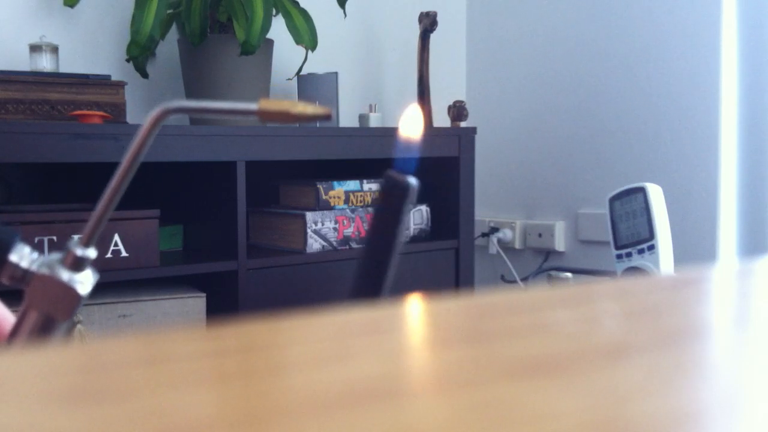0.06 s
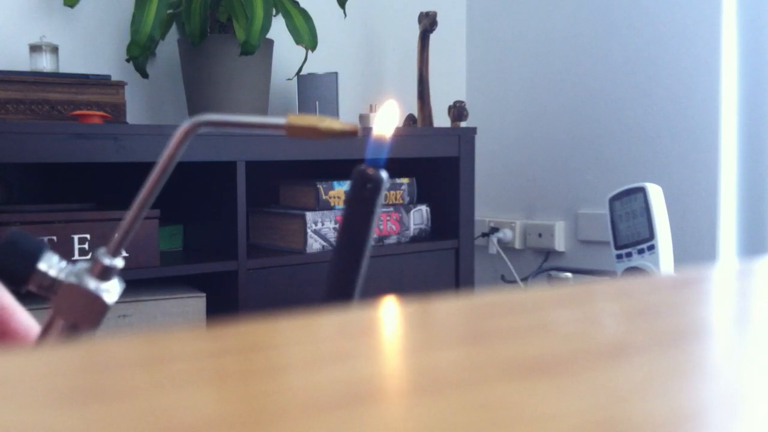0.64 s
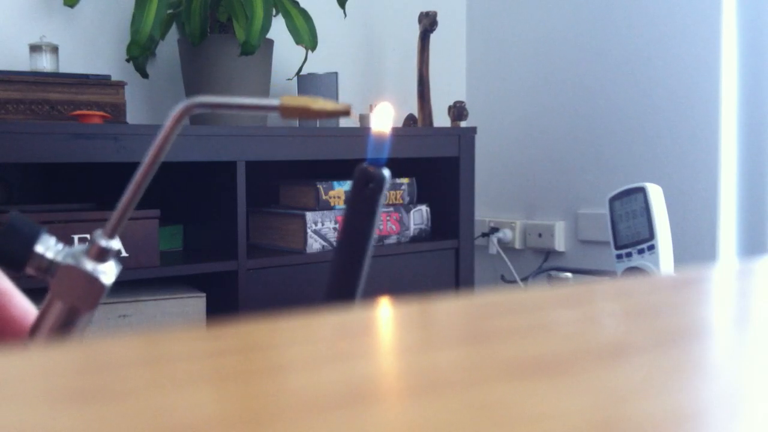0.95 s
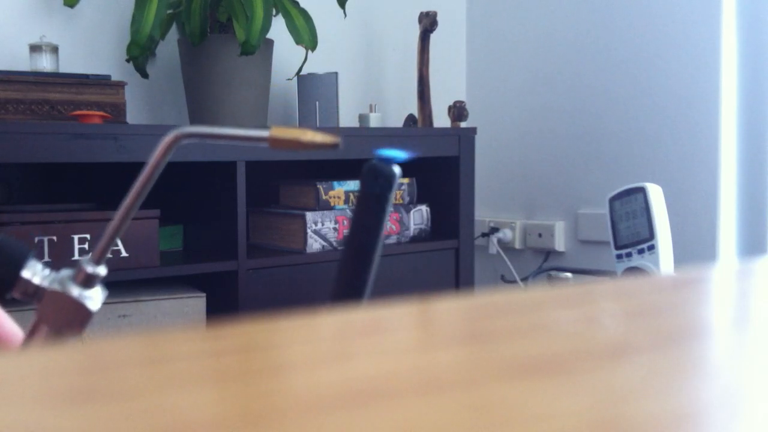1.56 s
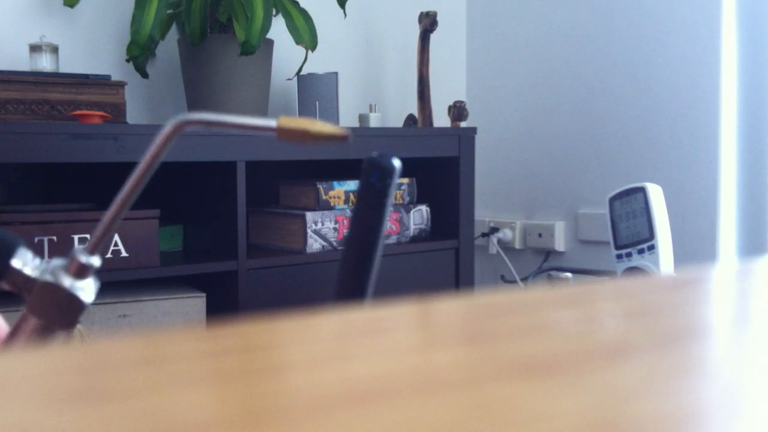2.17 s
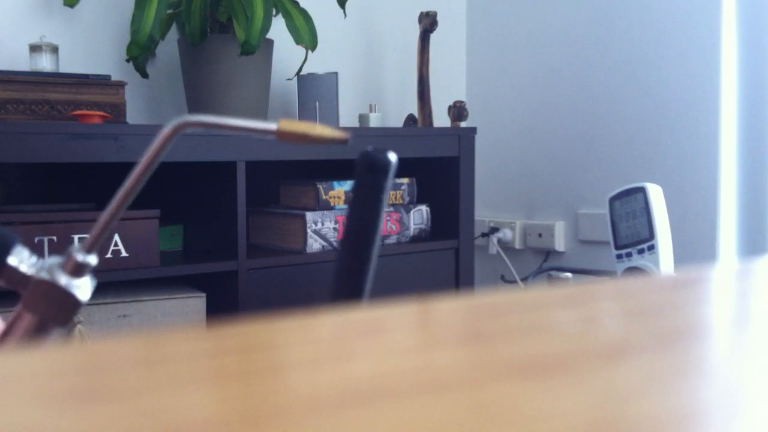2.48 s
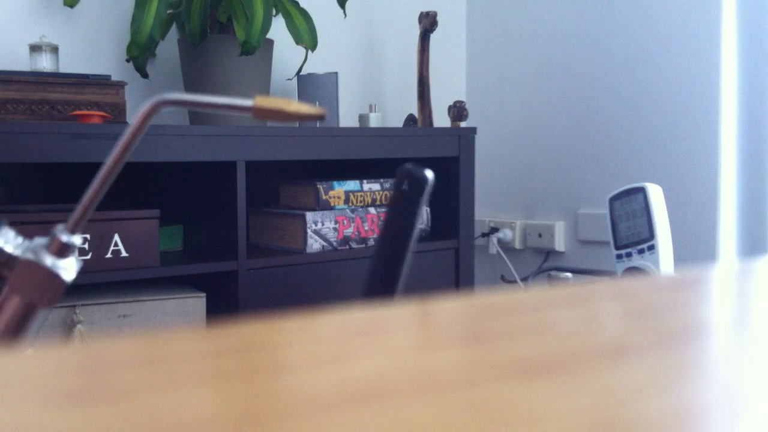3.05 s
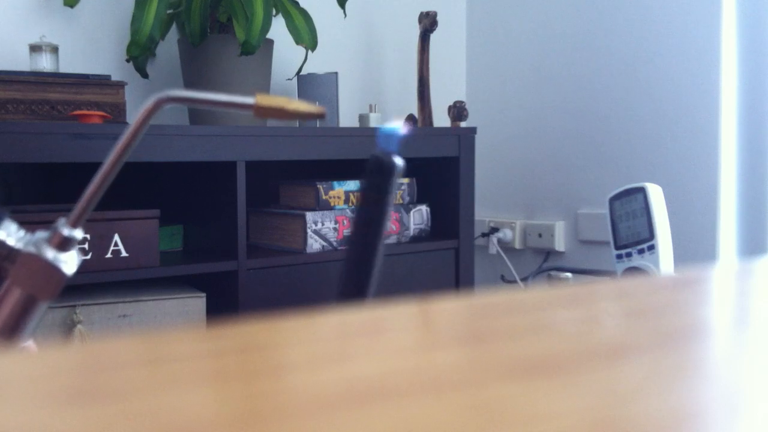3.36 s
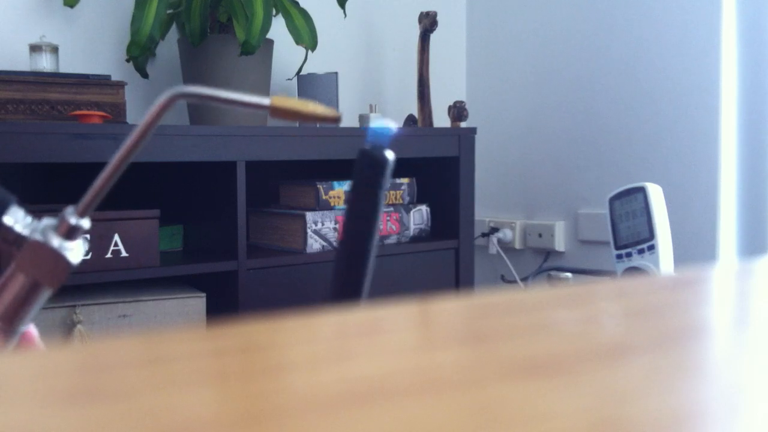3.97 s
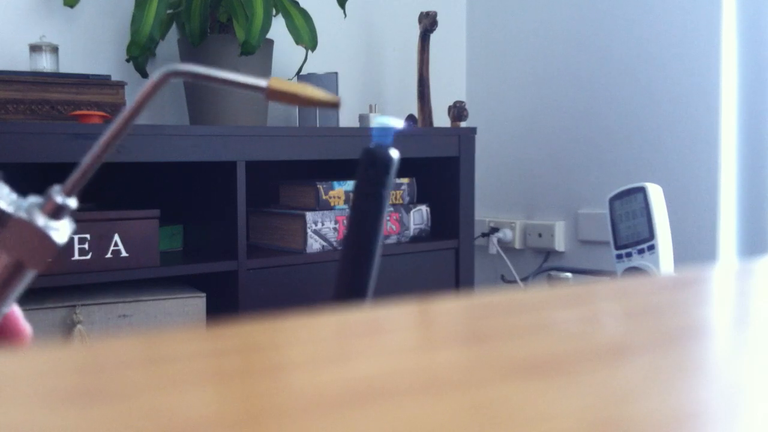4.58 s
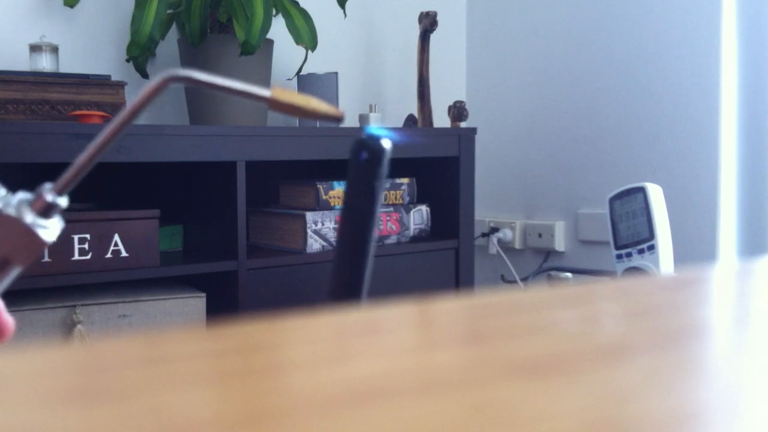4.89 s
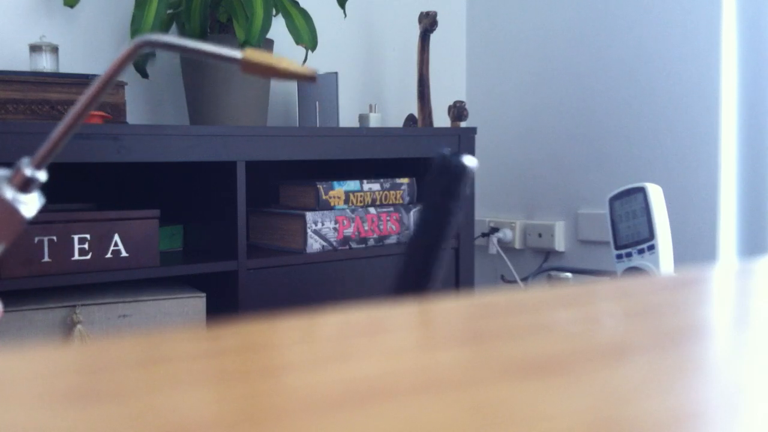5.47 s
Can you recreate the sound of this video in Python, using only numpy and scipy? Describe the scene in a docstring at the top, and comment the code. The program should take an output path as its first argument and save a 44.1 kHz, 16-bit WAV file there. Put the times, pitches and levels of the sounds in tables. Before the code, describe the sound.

A gas torch blows through a lighter flame in three hissing, fluttering bursts with small pops and one sharp lighter snap, over a low hum.

```python
"""A low steady hum fills a small room, then a gas torch blows through a lighter flame in three bursts.
The torch never catches fire. The speed of its jet sets the sound: a quiet fluttering roar while slow,
a loud even hiss while fast. The flame pops whenever the jet lets go of it.
Before the last burst a sleeve rustles softly and the lighter snaps on."""
import sys
import numpy as np
from scipy import signal
from scipy.fft import rfft, irfft, next_fast_len
from scipy.io import wavfile
from scipy.ndimage import map_coordinates

SR = 44100
rng = np.random.default_rng(int(sys.argv[2]) if len(sys.argv) > 2 else 0)


def dump_mix(stems):
    """Bounce the given channels to the path in sys.argv[1] as a 16-bit WAV at rate SR."""
    frames = np.atleast_2d(stems).T  # one column per channel
    limited = np.clip(frames, -1, 1)  # hard clip at full scale
    pcm = np.round(limited * 32767).astype(np.int16)
    wavfile.write(sys.argv[1], SR, pcm)


N = 252472

# tone of the room's noise: (frequency [Hz], relative level [dB])
ROOM_NOISE = [(15, -82), (25, -59), (64, -43), (96, -22), (164, -23), (198, -10), (445, -18), (482, -15),
              (598, -10.5), (684, -17), (1570, -21.5), (3090, -33), (7300, -40.5), (10500, -42.5),
              (13500, -38), (15500, -33)]
# tones of a humming appliance: (frequency [Hz], level [dB])
HUM_TONES = [(199.5, -58), (242, -66.5), (608, -66), (813, -67), (1610, -71)]
# the jet tears at the flame, then lets go: (start [s], end [s], jet gain [dB], pop level [dB])
BURSTS = [(0.24, 0.78, 2, -21.5), (0.926, 2.244, -.5, -23), (3.447, 5.091, 0, -19)]
# jet speed in each burst, heard as the centre of its noise: (time [s], centre [Hz])
FIRST_SPEED = [(0.24, 584), (0.29, 735), (0.34, 1420), (0.39, 1900), (0.51, 1900), (0.56, 2570),
               (0.71, 2480), (0.73, 3440), (0.76, 2550)]
SECOND_SPEED = [(0.922, 2520), (0.99, 12800), (1.14, 14900), (1.19, 7900), (1.26, 12400), (1.308, 3320),
                (1.51, 4300), (1.56, 2800), (1.69, 2550), (1.78, 1430), (1.89, 1480), (2.05, 4470.0),
                (2.13, 2000), (2.21, 5000)]
THIRD_SPEED = [(3.46, 587), (3.52, 1060), (3.57, 2690), (3.67, 1860), (3.73, 2960), (3.84, 1360),
               (3.9, 1500), (3.925, 2930), (4.02, 8100), (4.1, 4150), (4.27, 21200), (4.33, 10400),
               (4.39, 17700), (4.53, 8060), (4.63, 6400), (4.84, 2490), (5.06, 7260)]
# peaks and dips on the way over the table to the microphone: (frequency [Hz], width [Hz], gain [dB])
PATH_PEAKS = [(286, 12, 8), (390, 250, -1.5), (710, 156, 6), (857, 52, -16), (1596, 530, 4.5),
              (3475, 940, 4), (5044, 810, 5.5), (5560, 320, -7), (6170, 640, 4.5), (7630, 370, -5),
              (8210, 130, 6.5), (9950, 1650, -12), (11400, 380, -9.5), (11900, 400, 2.5),
              (14050, 1700, 3.5), (15250, 550, -1)]
# the room's echo: (frequency [Hz], time to fade by 60 dB [s])
ECHO_FADES = [(150, 0.5), (800, 0.47), (2000, 0.29), (5500, 0.27), (15000, .24)]
# a slow jet loses the flame for a moment: (start [s], end [s], dip [dB])
BREAKS = [(0.7, 0.711, -6), (3.846, 3.862, -22), (3.882, 3.888, -18), (3.902, 3.912, -26)]
# the flap as the jet catches the flame again: (pop level [dB], thump level [dB], fade time [s])
FLAP = (-27.5, -46, 0.075)
# the flame is hit, lit or goes out: (time [s], pop level [dB], thump level [dB], fade time [s])
PUFFS = [(.923, -24.5, -39, 0.036), (1.661, -24, -55, 0.01), (1.69, -34, -51, .03), (3.26, -31, -37, 0.047),
         (5.176, -33, -41, 0.096)]
# a soft sleeve rustle, then the lighter's clicks and snaps:
# (time [s], level [dB], brightness [Hz], rise time [s], fade time [s])
RUSTLE_AND_SNAPS = [(2.635, -45, 12000, 0.046, 0.19), (2.896, -42, 1600, .0002, 0.02),
                    (3.2443, -12, 6200, 0.00018, 0.02), (3.255, -24, 12000, .0005, 0.037),
                    (5.618, -40, 2000, 0.00041, 0.029)]
# ringing of the lighter's plastic body: (frequency [Hz], relative level [dB], fade time [s])
BODY_TONES = [(880, -8, 0.0069), (1340, -8, .011), (2960, -2, 0.0097)]

TOP_HZ = 15800  # upper edge of the treble


def amp(db):
    """Turn decibels into a number to multiply by."""
    return 10 ** (np.asarray(db) / 20)


def along(points, hz):
    """Read between (frequency, value) points, with octaves evenly spaced."""
    freqs, values = np.transpose(points)
    return np.interp(np.log(hz + 1), np.log(freqs + 1), values)


def wobble(rate):
    """A smooth random curve through `rate` values a second."""
    return map_coordinates(rng.standard_normal(int(N * rate / SR) + 4), [np.arange(N) * rate / SR])


def filtered(x, response):
    """Scale each frequency in x by response(hz)."""
    size = next_fast_len(len(x) + SR // 4)
    return irfft(rfft(x, size) * response(np.fft.rfftfreq(size, 1 / SR)), size)[:len(x)]


def noise(response, size):
    """Noise shaped by response(hz), with an average power of 1."""
    shaped = filtered(rng.standard_normal(size), response)
    return shaped / np.sqrt(np.mean(shaped ** 2) + 1e-20)


def hump(hz, centre_hz, rise, fall):
    """A broad hill of gain; rise and fall set how steep its low and high sides are."""
    ratio = (hz + 1) / centre_hz
    return np.sqrt(ratio ** rise / (1 + ratio * ratio) ** ((rise + fall) / 2))


def dying(t, fade_s):
    """A fade that drops 60 dB every fade_s seconds."""
    return np.exp(-np.log(1000) * t / fade_s)


def add(track, start_s, sound):
    """Mix a sound into the track at start_s."""
    part = track[round(start_s * SR):][:len(sound)]
    part += sound[:len(part)]


def small_source(x, low_hz):
    """A small thing gives off little sound below low_hz."""
    return signal.sosfilt(signal.butter(2, low_hz, "highpass", fs=SR, output="sos"), x)


def room_hum(air_db=-50, drift_db=-0.2, phase_drift=0.36):
    """Soft room noise and the slightly unsteady hum of an appliance."""
    t = np.arange(N) / SR
    air = amp(air_db + drift_db * wobble(5.6)) * noise(lambda hz: amp(along(ROOM_NOISE, hz)), N)
    hum = sum(amp(db) * np.sin(2 * np.pi * hz * t + phase_drift * wobble(10)) for hz, db in HUM_TONES)
    return air + np.sqrt(2) * hum


def flame_contact(t, attack_s=0.0033, release_s=0.02, break_edge_s=0.0013):
    """How firmly the jet holds the flame: on during a burst, dipping in each break."""
    def ramp(start, end, rise, fall):
        return np.clip(np.minimum((t - start) / rise, (end - t) / fall), 0, 1)
    held = sum(amp(db) * ramp(start, end, attack_s, release_s) for start, end, db, _ in BURSTS)
    dips_db = sum(db * ramp(start, end, break_edge_s, attack_s) for start, end, db in BREAKS)
    return held * amp(dips_db)


def gas_jet(full_db=-20, knee_hz=4460, growth=3.16, flutter_db=1.2, sway_db=0.75, calm_hz=4000):
    """Swirling gas: a faster jet makes smaller swirls, so its rush is higher and louder."""
    t = np.arange(N) / SR
    times, centre_hz = np.vstack([FIRST_SPEED, SECOND_SPEED, THIRD_SPEED]).T
    centre = np.exp(np.interp(t, times, np.log(centre_hz)) + 0.04 * wobble(18))  # wanders about 4%
    loudness = amp(full_db) / np.sqrt(1 + (knee_hz / centre) ** growth)  # levels off above the knee
    hz, frames, spectrum = signal.stft(rng.standard_normal(N), SR, nperseg=512)
    swirls = hump(hz[:, None], np.interp(frames, t, centre), rise=2.594, fall=4.24)
    swirls /= np.sqrt(np.mean(swirls ** 2 * (hz < TOP_HZ)[:, None], axis=0))  # same power at any speed
    rush = signal.istft(spectrum * swirls, SR, nperseg=512)[1][:N]
    # a slow jet lets the flame flutter; a fast one hisses evenly
    flutter = flutter_db * wobble(260) / np.sqrt(1 + (centre / calm_hz) ** 2)
    sway = sway_db * wobble(35)
    return small_source(rush * flame_contact(t) * loudness * amp(flutter + sway), low_hz=110)


def table_path(hz):
    """The path over the table boosts some frequencies and weakens others."""
    def resonance(centre, width):
        return centre ** 2 - hz ** 2 + 1j * hz * width
    return np.prod([resonance(centre, width * amp(db / 2)) / resonance(centre, width * amp(-db / 2))
                    for centre, width, db in PATH_PEAKS], axis=0)


def room_echo(x, delay_s=0.005):
    """The walls answer after a few milliseconds; the treble dies first."""
    hz, t, spectrum = signal.stft(rng.standard_normal(SR // 2), SR, nperseg=256)
    tail = signal.istft(spectrum * dying(t, along(ECHO_FADES, hz)[:, None]), SR, nperseg=256)[1]
    tail = np.pad(tail / np.linalg.norm(tail), (round(delay_s * SR), 0))
    return signal.fftconvolve(x, tail)[:N]


def flame_pops(end_lead_s=0.013, end_thump_db=-51, end_fade_s=0.022):
    """The flame flaps with a short puff over a low thump; one such pop ends every break and burst."""
    out, t = np.zeros(N), np.arange(SR // 5) / SR
    swell = 1 - np.exp(-t / 0.0006)
    flaps = [(end, *FLAP) for _, end, _ in BREAKS]
    end_pops = [(end - end_lead_s, db, end_thump_db, end_fade_s) for _, end, _, db in BURSTS]
    for start, pop_db, thump_db, fade_s in PUFFS + flaps + end_pops:
        puff = noise(lambda hz: hump(hz, centre_hz=1160, rise=2.04, fall=3.66), len(t))
        thump = noise(lambda hz: hump(hz, centre_hz=260, rise=2.1, fall=4.5), len(t))
        add(out, start, (amp(pop_db) * puff + amp(thump_db) * thump) * dying(t, fade_s) * swell)
    return out


def sleeve_and_lighter(body_db=-6):
    """The sleeve is a soft swell of noise; each lighter snap is a crack that rings its plastic body."""
    out, t = np.zeros(N), np.arange(SR // 5) / SR
    for start, db, bright_hz, rise_s, fade_s in RUSTLE_AND_SNAPS:
        hiss = noise(lambda hz: hump(hz, bright_hz, rise=0.6, fall=1), len(t)) * dying(t, fade_s)
        body = sum(amp(level + rng.normal(0, 1.8)) * np.sin(2 * np.pi * hz * t) * dying(t, ring_s)
                   for hz, level, ring_s in BODY_TONES)
        swell = 1 - np.exp(-t / rise_s)
        add(out, start, amp(db) * (hiss + amp(body_db) * body) * swell)
    return small_source(out, low_hz=450)


def rustle_and_snaps_in_room(echo_db=-4, walls=4):
    """Each rustle or snap sends different noise towards each wall, so its echo is smooth."""
    direct = sleeve_and_lighter()
    echoes = sum(room_echo(sleeve_and_lighter()) for _ in range(walls)) / np.sqrt(walls)
    return direct + amp(echo_db) * echoes


def scene():
    """Torch, sleeve and lighter close by over the hum, the same in both channels."""
    gas = gas_jet() + flame_pops()
    torch = filtered(gas, table_path) + amp(-12) * room_echo(gas)
    mono = torch + rustle_and_snaps_in_room() + room_hum()
    return np.array([mono, mono])


def record(dry):
    """Cut off the highest treble, over a 200 Hz wide slope around TOP_HZ."""
    return np.array([filtered(channel, lambda hz: np.clip((TOP_HZ - hz) / 200 + 0.5, 0, 1))
                     for channel in dry])


dry = scene()
out = record(dry)
dump_mix(out)
```